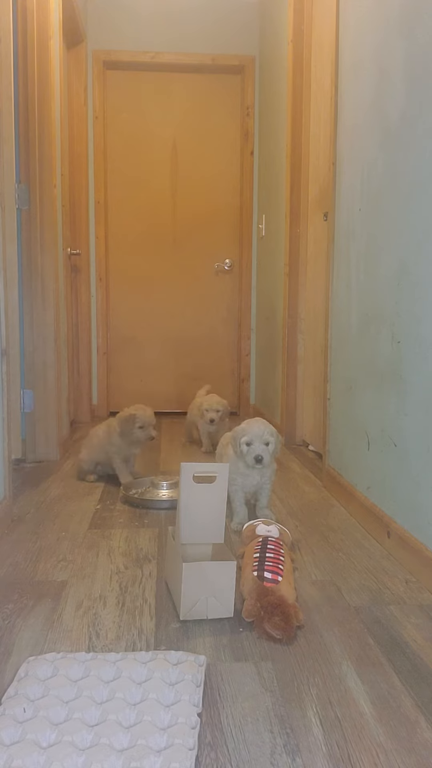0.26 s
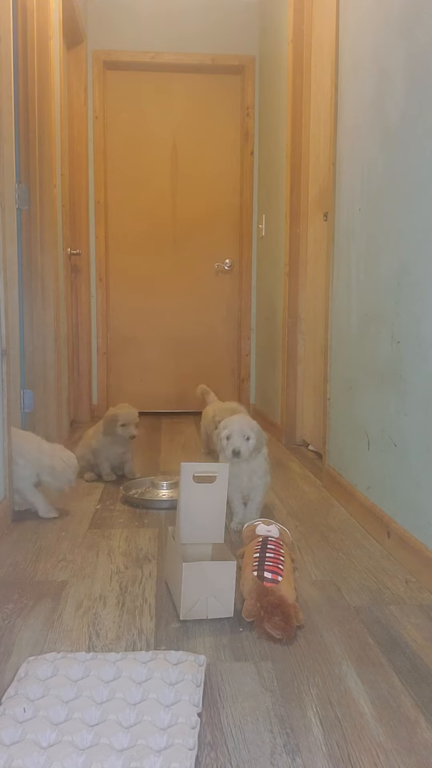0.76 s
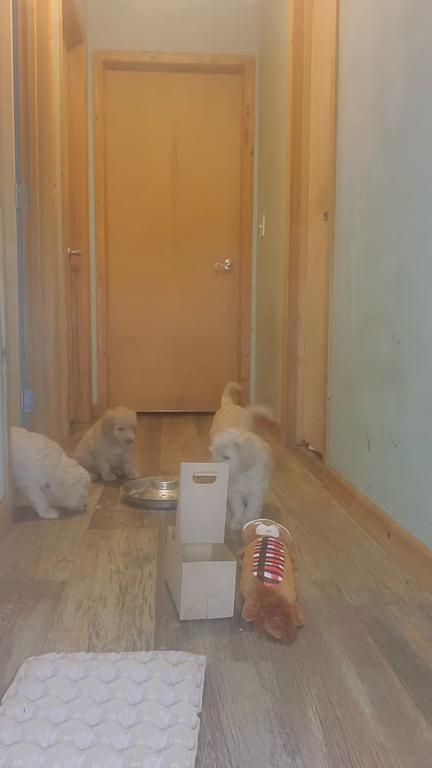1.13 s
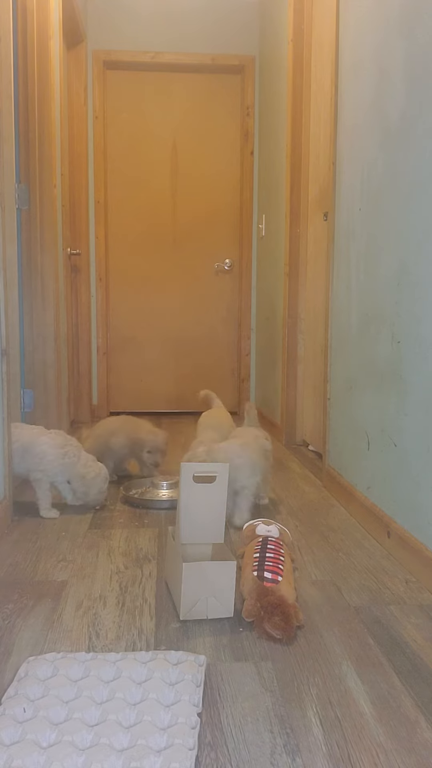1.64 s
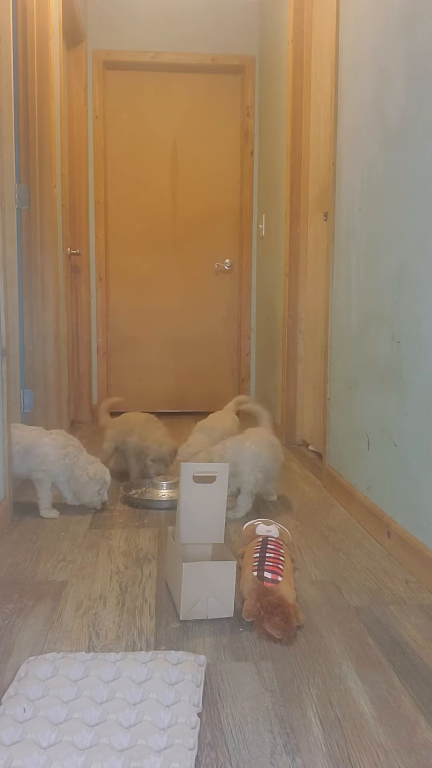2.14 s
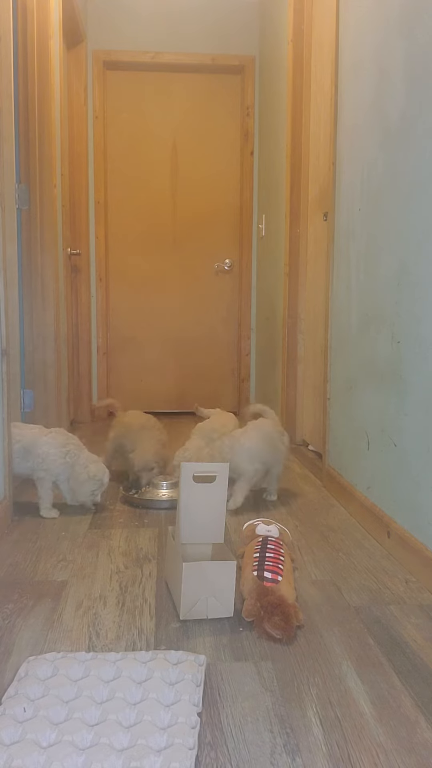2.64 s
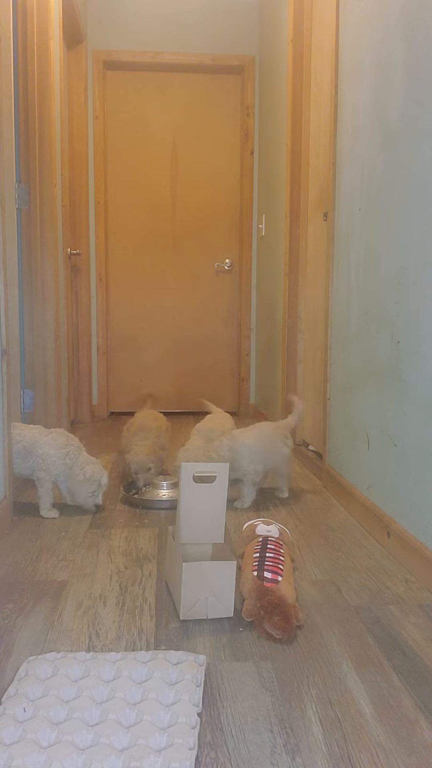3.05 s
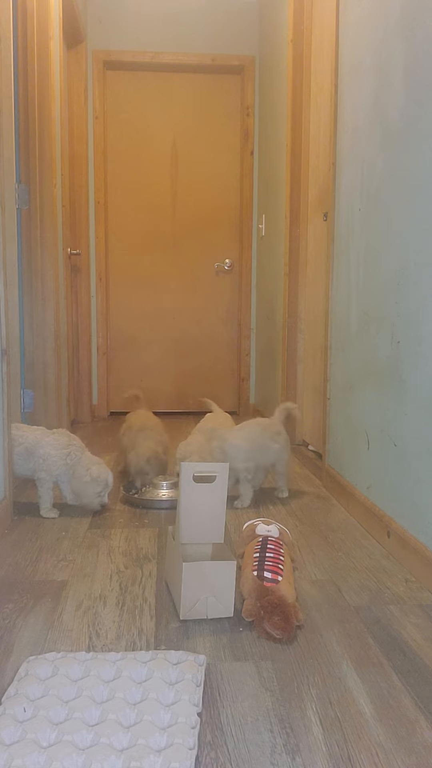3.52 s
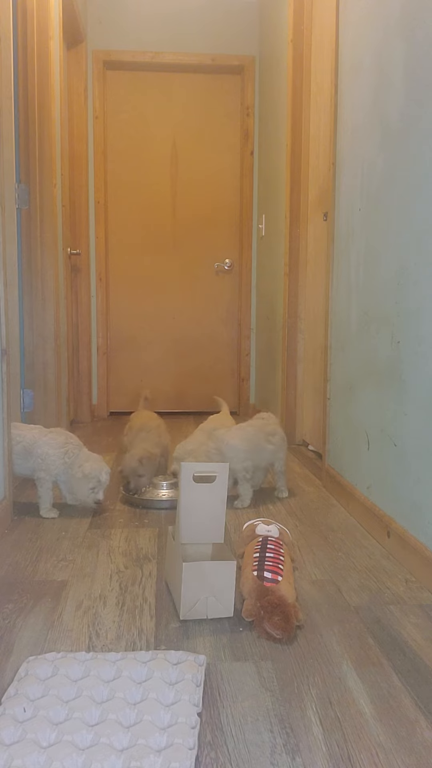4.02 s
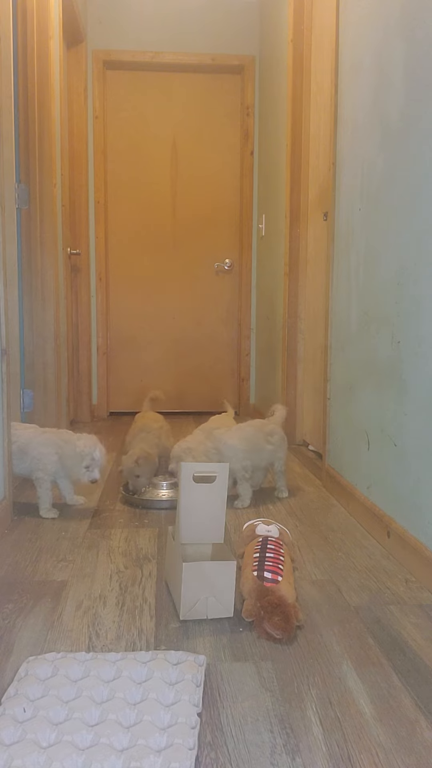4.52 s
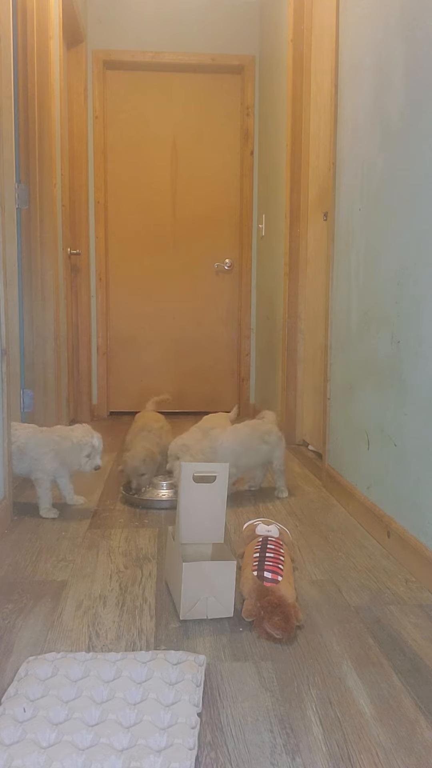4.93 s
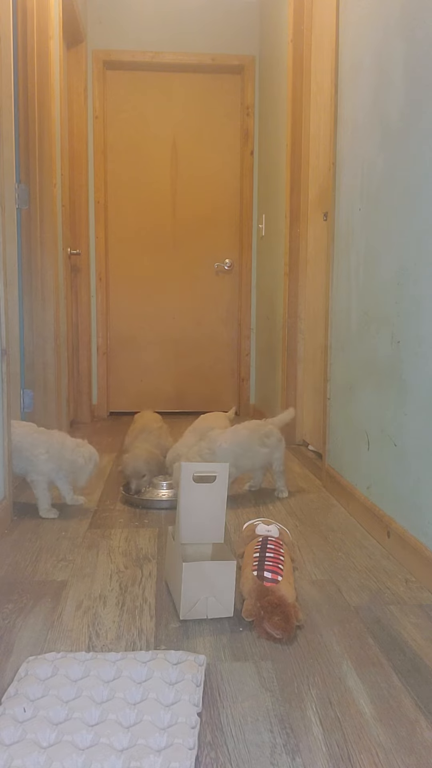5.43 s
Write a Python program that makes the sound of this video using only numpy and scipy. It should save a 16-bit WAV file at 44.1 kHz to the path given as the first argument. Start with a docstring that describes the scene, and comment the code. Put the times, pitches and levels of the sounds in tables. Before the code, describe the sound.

A low motor hum and soft room air fill a narrow, bare hallway. Puppies scuff and tick faintly on the floor, and one gives a single woof that rings briefly between the walls. Then they eat, mostly to the left of the microphone: kibble cracks sharply, teeth and claws tap, and a steel bowl knocks with a short, damped ring.

```python
"""A low hum fills a narrow, bare hallway: a motor somewhere in the house, beating slowly against the mains.
Puppies scuff and tick around a steel food bowl, mostly to the left of the microphone.
One gives a single woof that rings between the walls. Then they eat: kibble cracks,
claws and teeth tap, and the bowl, damped by its food, knocks on the floor."""
import sys
import numpy as np
from scipy import signal
from scipy.fft import rfft, irfft
from scipy.io import wavfile
from scipy.ndimage import map_coordinates

SR = 44100
rng = np.random.default_rng(int(sys.argv[2]) if len(sys.argv) > 2 else 0)


def pcm_store(signal):
    """Save signal as 16-bit PCM."""
    levels = np.round(np.clip(np.atleast_2d(signal), -1, 1) * 32767)
    wavfile.write(sys.argv[1], SR, levels.astype(np.int16).T)


N = 250047
TIME = np.arange(N) / SR
FILTER_HZ = np.maximum(np.fft.rfftfreq(4096, 1 / SR), 1)


def from_db(db):
    """Decibels to gain."""
    return 10 ** (np.asarray(db) / 20)


def unit_rms(x):
    """Scale to unit power."""
    return x / np.sqrt(np.mean(x ** 2) + 1e-20)


def at_hz(points, hz=FILTER_HZ):
    """Read a table on a log-frequency axis."""
    table_hz, values = np.array(points).T
    return np.interp(np.log(hz), np.log(table_hz), values)


def impulse(db):
    """The causal, most compact pulse that has this spectrum."""
    cepstrum = irfft(np.log(from_db(db)))
    half = len(cepstrum) // 2
    cepstrum[1:half] *= 2
    cepstrum[half + 1:] = 0
    return irfft(np.exp(rfft(cepstrum)))


def through(x, response):
    """Pass a sound through an impulse response, channel by channel."""
    return signal.fftconvolve(np.atleast_2d(x), np.atleast_2d(response), axes=1)[:, :N]


def drift(per_s):
    """A random wander that turns so many times a second."""
    return map_coordinates(rng.standard_normal(N), [TIME * per_s], order=1)


def add(track, start_s, sound):
    """Mix a short sound into a stereo track."""
    start = round(start_s * SR)
    track[:, start:start + sound.shape[-1]] += sound[..., :N - start]


def motor_hum(gain_db=3.8, waver=0.1, beat_s=0.777, crest_s=0.49, beat_depth=0.37):
    """Hum from elsewhere in the house; its lowest line swells as motor and mains drift into step."""
    # Motor and mains lines. Each row: frequency in Hz, relative level in dB.
    hum_lines = [(60.0, -45.5), (120.0, -59), (117.4, -67), (176.1, -68), (581.4, -66)]
    lines = []
    for hz, db in hum_lines:
        sine = np.sqrt(2) * np.sin(2 * np.pi * hz * TIME + 2 * np.pi * rng.random())
        lines.append(from_db(db + gain_db) * sine * (1 + waver * drift(0.95)))
    beat = 1 + beat_depth * np.cos(2 * np.pi * (TIME - crest_s) / beat_s)
    return lines[0] * beat + sum(lines[1:])


def room_tone():
    """The still air of the house, a soft rush all around the microphone."""
    # The air's spectrum. Each row: frequency in Hz, noise density in dB.
    air_spectrum = [(22, -92), (32, -86), (45, -71), (130, -76), (300, -82), (480, -74.5), (580, -74.5),
                    (720, -78.5), (1300, -80), (2000, -89.5), (3200, -92.5), (5000, -107), (7000, -117),
                    (11000, -118), (15500, -114)]
    # Its stereo width. Each row: frequency in Hz, side over mid in dB.
    air_width = [(60, -17), (150, -8), (380, 2.5), (950, 7.5), (2380, 3), (5980, -1), (15000, 0)]
    mid, side = rng.standard_normal((2, N)) * np.sqrt(SR / 2)
    width_db = at_hz(air_width)
    mid_db = at_hz(air_spectrum) - 10 * np.log10(1 + from_db(width_db) ** 2)
    return through(mid, impulse(mid_db)) + through(side, impulse(mid_db + width_db)) * [[1], [-1]]


def patter(per_s=24, level_db=-30, centre_hz=2300, fall_db_per_octave=15):
    """Faint ticks of claws and chewing, at random throughout."""
    ticks = (rng.random(N) < per_s / SR) * rng.standard_normal(N)
    octaves_away = np.abs(np.log2(FILTER_HZ / centre_hz))
    return through(ticks, impulse(level_db - fall_db_per_octave * octaves_away))[0]


def scatter(stretch=1, rise_s=0.0028, length_s=0.0038, wall_s=0.024, wall_db=-8.5):
    """A brief stereo burst, scattered by floor and frames, and its echo off the wall."""
    t = TIME[:SR // 15]
    echo_s = wall_s * (1 + 0.07 * rng.standard_normal())   # shifts with the puppy's place
    burst = (1 - np.exp(-t / (stretch * rise_s))) * np.exp(-(t / (stretch * length_s)) ** 2)
    echo = from_db(wall_db) * np.exp(-((t - echo_s) / length_s) ** 2)
    grains = rng.standard_normal((2, len(t))) * (burst / burst.max() + echo)
    return grains / np.sqrt(np.sum(grains ** 2, axis=1, keepdims=True))


def resonances(spread_db=2.8, spacing_hz=100):
    """Every piece of kibble and every jaw rings at many close pitches of its own: a ripple in dB."""
    ripple = np.clip(rng.standard_normal(len(FILTER_HZ)), -2, 1.5)
    return spread_db * map_coordinates(ripple, [FILTER_HZ / spacing_hz], order=1)


def contact(crack_db, crack_hz, fall_db, tap_db, tap_hz, rise_db=12, shoulder_octaves=0.062):
    """A brittle crack over a dull tap; rise and fall are per octave below and above the crack's peak."""
    # A blunt contact. Each row: multiple of the tap's pitch, relative level in dB.
    tap_spectrum = [(.04, -43), (.12, -14), (.3, -8), (.55, -2.5), (.75, 1), (1, 1), (1.35, -10.5), (2, 1),
                    (4, -30), (9, -63.5)]
    octaves = np.log2(FILTER_HZ / crack_hz)
    slope_db = np.where(octaves > 0, fall_db, rise_db)
    crack = from_db(crack_db - slope_db * (np.hypot(octaves, shoulder_octaves) - shoulder_octaves))
    tap = from_db(tap_db + at_hz(tap_spectrum, FILTER_HZ / tap_hz))
    return impulse(20 * np.log10(np.hypot(crack, tap)) + resonances())


def scuffs():
    """Paws and muzzles brush floor and food, longer and narrower in pitch than a crack: direct, to hall."""
    # Each row: start in seconds, relative level in dB, peak in Hz.
    touches = [(0.321, -23.5, 4030), (0.83, -23.5, 4000), (1.917, -19.5, 2920), (1.983, -20.5, 1990),
               (2.114, -19.5, 2940), (2.497, -13, 1770), (2.541, -12, 3140), (3.253, -15, 3940),
               (3.725, -19.5, 2440), (4.088, -9.5, 1940), (4.865, -13, 3020), (5.075, -16.5, 3190)]
    track = np.zeros((2, N))
    for start_s, db, hz in touches:
        touch = contact(db, hz, fall_db=25, tap_db=db + 3, tap_hz=1050, rise_db=18)
        add(track, start_s, through(touch, scatter(stretch=2)))
    return np.array([track, track])


def woof_gesture(opens_s=1.188, opening_s=0.012, hold_s=0.0461, voiced_s=0.097, top_hz=416.9):
    """One push of effort: the voice opens and clears, holds, then sinks and roughens until cut off."""
    swell_db_per_s, release_db_per_s, silent_db = 559, 946, -48
    sag_hz_per_s, sag_db_per_s, sag_rough_per_s = 230, 298, 1.3
    gruff_rough, open_rough, closed_loss_db = 0.58, 0.26, 14.5
    t = TIME - opens_s
    effort_db = swell_db_per_s * np.minimum(t, 0) - release_db_per_s * np.maximum(t - voiced_s, 0)
    effort_db = np.maximum(effort_db, silent_db)
    opened = np.clip(t / opening_s, 0, 1)
    sag_s = np.maximum(np.minimum(t, voiced_s) - hold_s, 0)
    # pitch, chest tone and overtones all follow the effort
    pitch_hz = top_hz + 2.08 * effort_db - sag_hz_per_s * sag_s
    tone_db = -7.5 + 0.61 * effort_db - closed_loss_db * (1 - opened) - sag_db_per_s * sag_s
    overtone_db = effort_db - 16
    clearing = (open_rough - gruff_rough) * opened * from_db(effort_db)
    rough = np.clip(gruff_rough + clearing + sag_rough_per_s * sag_s, 0, 1)
    return pitch_hz, tone_db, overtone_db, rough, effort_db > silent_db


def woof(tail, jitter=0.026, flutter=0.096, gruff=9.1, pan_db=2.5, lag_s=0.00047):
    """A gruff onset opens into a round chest tone; uneven glottal pulses and rasp ring in the throat."""
    # Resonances of throat and muzzle. Each row: frequency in Hz, gain in dB.
    throat = [(90, -58.5), (400, 11), (520, -2.5), (800, 2.5), (1020, 2.5), (1220, 3.5), (1650, -8.5),
              (2080, -12), (2500, -13.5), (2850, -22.5), (3150, -21), (4000, -47.5), (5100, -38.5),
              (5700, -35), (8500, -63.5)]
    pitch_hz, tone_db, overtone_db, rough, sounding = woof_gesture()
    phase = 2 * np.pi * np.cumsum(pitch_hz * (1 + jitter * rough * drift(500))) / SR
    # while the folds flap loosely the tone stumbles in phase and strength
    stumble = gruff * rough ** 3
    tone = sounding * from_db(tone_db) * np.sqrt(2) * np.sin(phase + stumble * drift(150))
    tone *= (1 + stumble * drift(160)) / np.hypot(1, stumble)
    pulses = unit_rms(sum(np.cos(k * phase) for k in range(2, 20))) * (1 + flutter * drift(250))
    puffs = rng.standard_normal(N) * (1 + np.cos(phase))   # turbulence, one puff a cycle
    buzz = unit_rms(through(pulses, impulse(at_hz(throat))))
    rasp_tilt_db = np.log2(FILTER_HZ / 1000)   # brighter by 1 dB an octave
    rasp = unit_rms(through(puffs, impulse(at_hz(throat) + rasp_tilt_db)))
    voice = unit_rms((1 - rough) * buzz + rough * rasp)[0] / np.hypot(1 - rough, rough)
    overtones = sounding * from_db(overtone_db) * voice * np.sqrt(0.5)
    # the overtones reach the right side of the microphone a moment later
    direct = from_db(-4) * np.array([overtones, np.interp(TIME - lag_s, TIME, overtones)])
    direct += tone * from_db([[pan_db], [-pan_db]])
    to_hall = from_db(-4.5) * tone + from_db(0.5) * overtones
    return direct + through(to_hall, tail)


def bites():
    """Kibble snaps between the teeth: the direct sound, and what goes into the hall."""
    # Each row: start in seconds, crack level in dB, its peak in Hz, fall above it in dB per octave,
    # tap level in dB, tap pitch in Hz, gain of the direct sound in dB. Levels are relative.
    cracks = [(2.574, -6, 3760, 22, -3, 1150, 1.5), (3.322, 2, 2370, 20.5, 5.5, 1020, -2),
              (3.341, -8, 2300, 20, -7, 804, 8.5), (4.1642, 17.5, 2640, 15, 8, 1050, -5),
              (4.388, 10.5, 3720, 11.5, 13.5, 1480, 0.5), (4.542, -12, 3070, 18, 1, 940, 5.5),
              (4.7055, 6, 4330, 9, -9.5, 2030, 4), (5.2476, -6.5, 3020, 20.5, -0.5, 770, 1.5),
              (5.444, 6.5, 2520, 13, 7.5, 730, -0.5), (5.456, 4, 2510, 22, 0, 1230, 6)]
    direct, to_hall = np.zeros((2, 2, N))
    for start_s, crack_db, crack_hz, fall_db, tap_db, tap_hz, direct_db in cracks:
        click = contact(crack_db, crack_hz, fall_db, tap_db, tap_hz)
        add(direct, start_s, from_db(direct_db) * through(click, scatter()))
        add(to_hall, start_s, click)
    return np.array([direct, to_hall])


def bowl_knocks(direct_db=-1, hall_db=-1.5, contact_s=0.003, uneven_db=1):
    """Each knock rings the steel bowl's modes with strengths of its own: direct, to hall."""
    # The bowl, damped by its food. Each row: mode in Hz, relative level in dB, seconds to fall 60 dB.
    modes = [(246, -5.5, 0.07), (342, 1.5, 0.097), (353.8, 4.5, 0.13), (480, -4, 0.13), (1014, -13, 0.29),
             (1480, -35, 0.071), (2450, -19, 0.21), (3160, -37, .12)]
    # Each row: start in seconds, relative level in dB, brightness in dB per octave.
    knocks = [(3.269, -40, -4), (4.09, -44, -6), (4.1644, -29.5, 1.5), (4.387, -22.5, -5.5),
              (5.446, -42.5, 5.5)]
    track, t = np.zeros((2, N)), TIME[:SR // 3]
    octaves = np.log2(np.array(modes)[:, 0] / modes[0][0])
    attack = 1 - np.exp(-(t / contact_s) ** 2)   # a muzzle is a soft hammer
    for start_s, knock_db, bright_db in knocks:
        strengths_db = knock_db + bright_db * octaves + rng.normal(0, uneven_db, len(modes))
        ring = sum(from_db(db + blow_db - 60 * t / t60) * np.sin(2 * np.pi * hz * t)
                   for (hz, db, t60), blow_db in zip(modes, strengths_db))
        add(track, start_s, ring * attack)
    return np.array([from_db(direct_db) * track, from_db(hall_db) * track])


def hall_tail(build_s, decay_scale):
    """Stereo echoes between the bare walls; they thicken quickly and each band dies at its own rate."""
    # Each row: band centre in Hz, seconds to fall 60 dB before scaling by decay_scale.
    hall_decay = [(150, 0.16), (400, 0.59), (850, 0.63), (1500, 0.63), (2500, 0.54), (5000, 0.56),
                  (11000, 0.45), (16000, 0.48)]
    t, hz = TIME[:SR], np.maximum(np.fft.rfftfreq(SR, 1 / SR), 1)
    white = rfft(rng.standard_normal((2, SR)))
    centres_hz, t60s = np.array(hall_decay).T
    tail = 0
    for centre_hz, t60 in zip(centres_hz, t60s):
        band = np.interp(np.log(hz), np.log(centres_hz), centres_hz == centre_hz)
        tail += irfft(white * band) * from_db(-60 * t / (decay_scale * t60))
    tail *= 1 - np.exp(-(t / build_s) ** 2)
    return tail / np.sqrt(np.sum(tail ** 2) / 2)


def scene(eating_direct_db=4.5, eating_hall_db=6.5):
    """The hallway from the microphone: puppies toward the left, hum and room tone throughout."""
    # The puppies' lean to the left. Each row: frequency in Hz, left over right in dB.
    left_lean = [(300, 2), (1000, -0.5), (2000, 3), (4000, 7.5), (8000, 9.5), (12000, 3.5)]
    # the woof travels down the hallway and rings on; sounds made among the furry bodies die sooner
    long_tail = hall_tail(build_s=0.0032, decay_scale=0.99)
    short_tail = hall_tail(build_s=0.0055, decay_scale=0.62)
    bark = woof(long_tail)
    background = motor_hum() + room_tone()
    ticks = patter()
    direct_ticks = through(ticks, scatter())
    direct, to_hall = bites() + bowl_knocks() + scuffs()
    eating = from_db(eating_direct_db) * (direct + direct_ticks)
    eating += from_db(eating_hall_db) * through(to_hall + ticks, short_tail)
    lean = [impulse(at_hz(left_lean) * side / 2) for side in (1, -1)]
    return through(bark + eating, lean) + background


def record(dry, cutoff_hz=16000):
    """The microphone's port swallows a band near 8 kHz, and the very top is cut."""
    # The port's response. Each row: frequency in Hz, gain in dB.
    port = [(6500, -6), (7400, -14.5), (8300, -21), (9600, -6.5), (11300, 1.5), (13500, -2), (15500, -14.5)]
    lowpass = signal.ellip(10, 0.1, 80, cutoff_hz, fs=SR, output="sos")
    return signal.sosfilt(lowpass, through(dry, impulse(at_hz(port))))


dry = scene()
out = record(dry)
pcm_store(out)
```